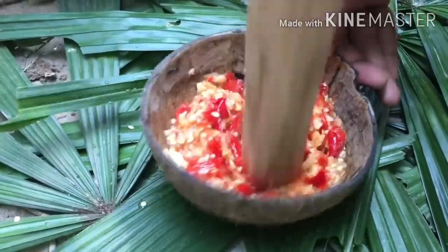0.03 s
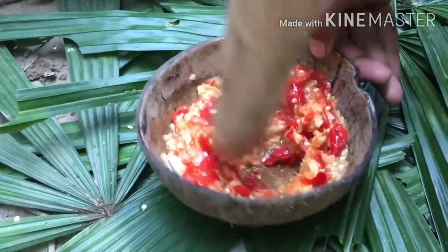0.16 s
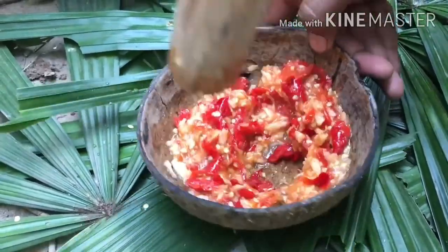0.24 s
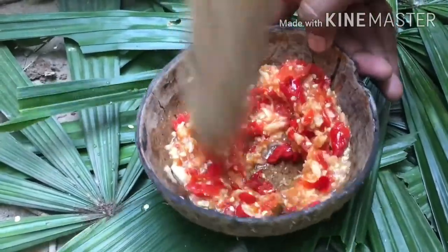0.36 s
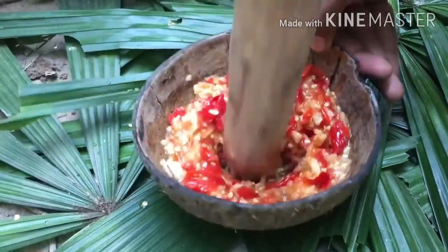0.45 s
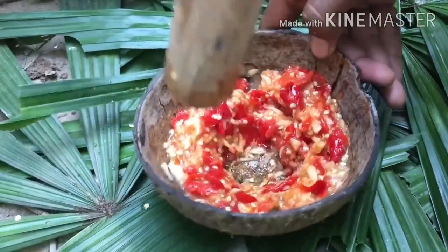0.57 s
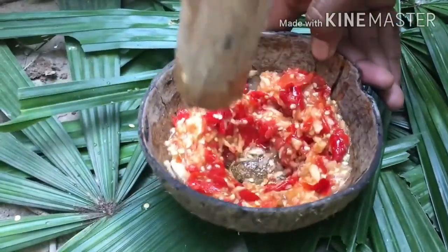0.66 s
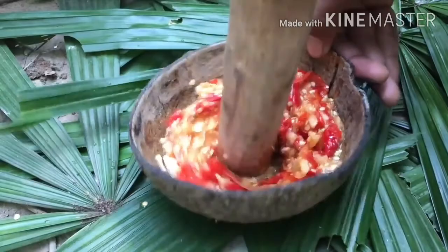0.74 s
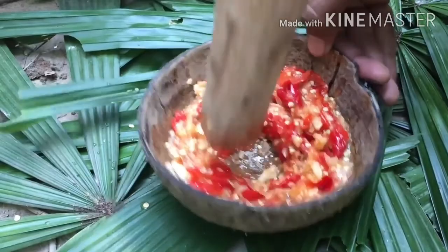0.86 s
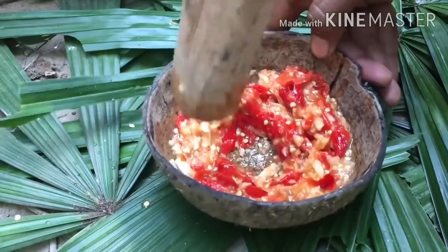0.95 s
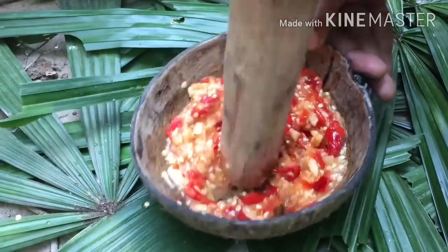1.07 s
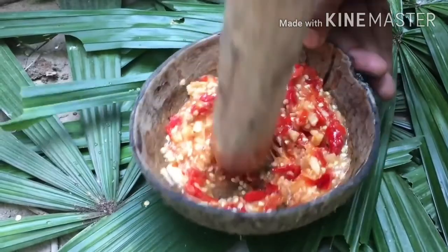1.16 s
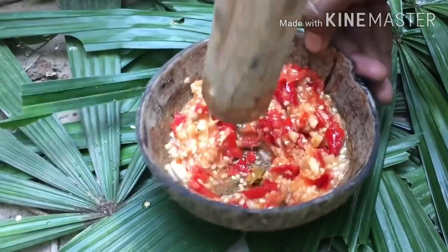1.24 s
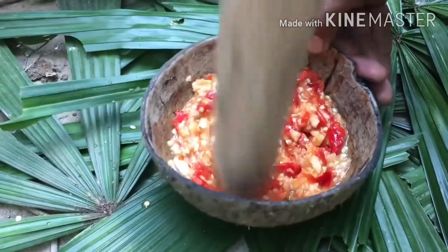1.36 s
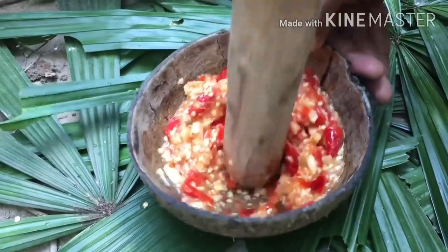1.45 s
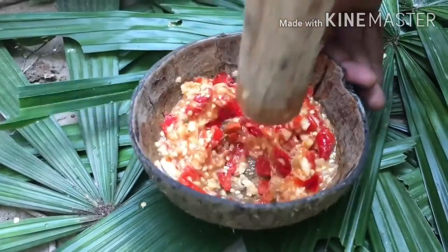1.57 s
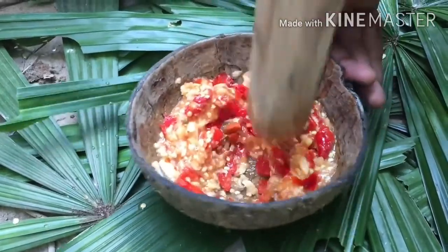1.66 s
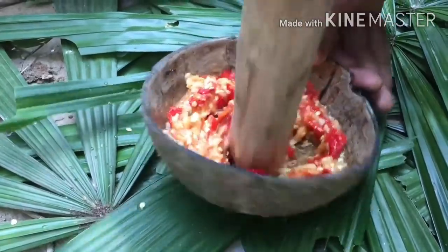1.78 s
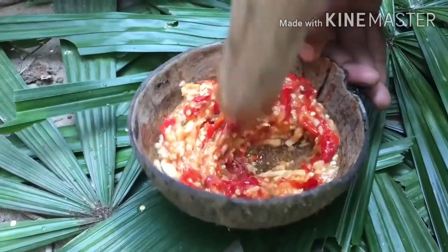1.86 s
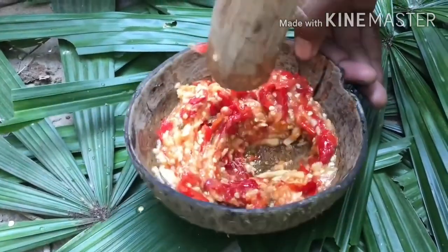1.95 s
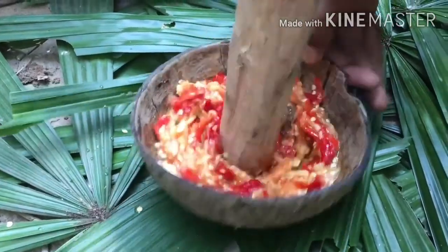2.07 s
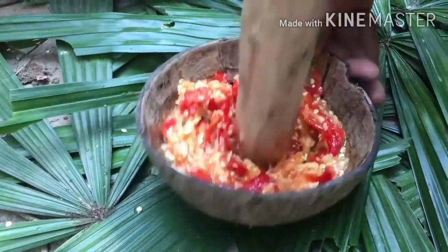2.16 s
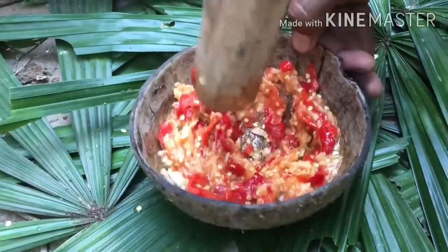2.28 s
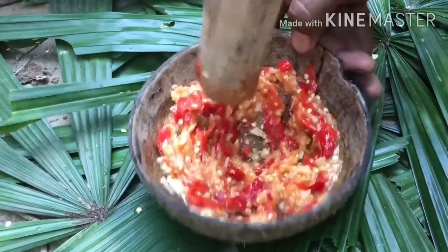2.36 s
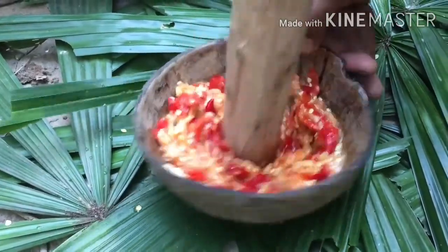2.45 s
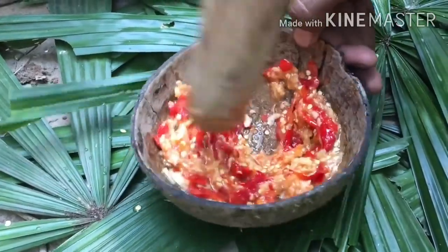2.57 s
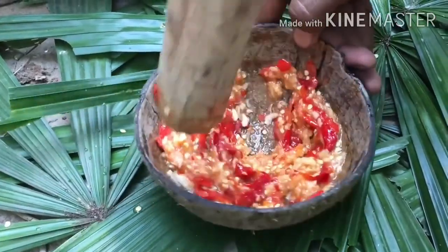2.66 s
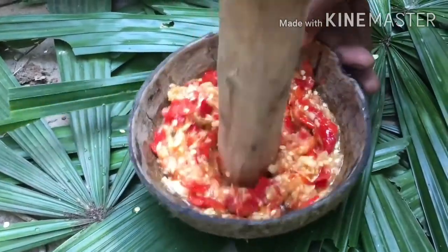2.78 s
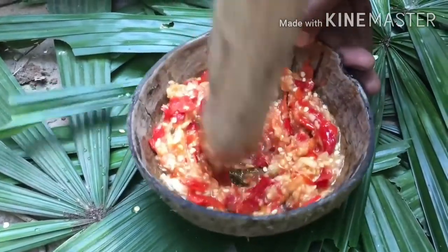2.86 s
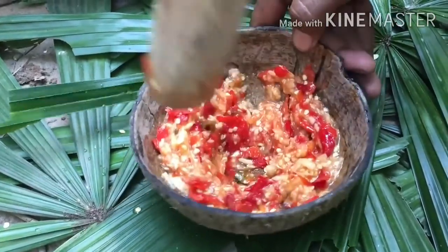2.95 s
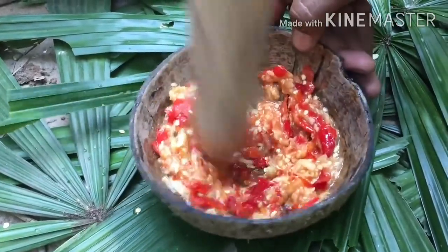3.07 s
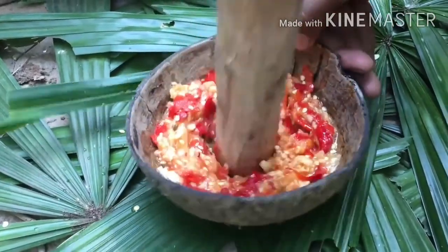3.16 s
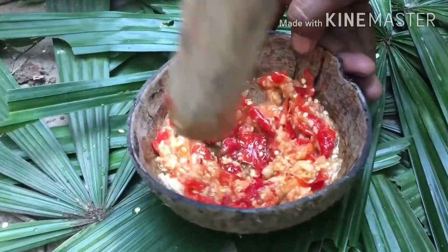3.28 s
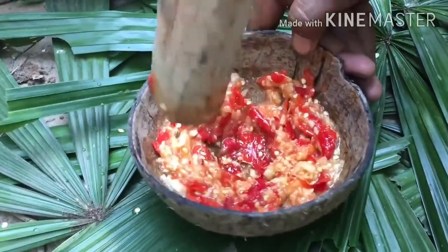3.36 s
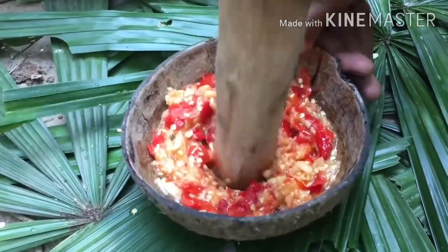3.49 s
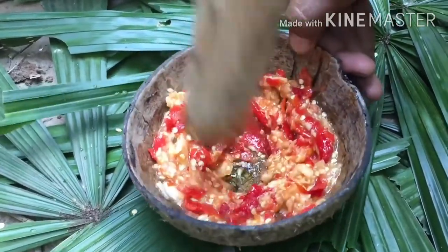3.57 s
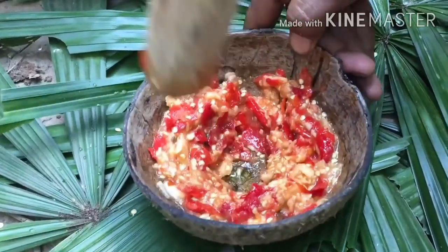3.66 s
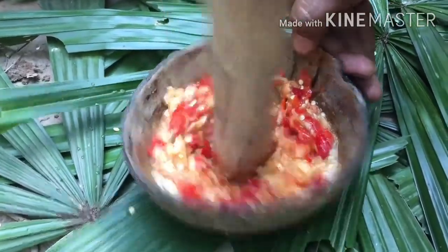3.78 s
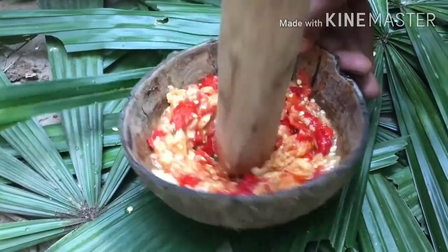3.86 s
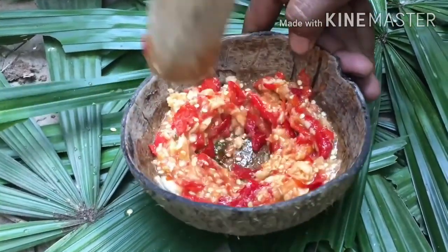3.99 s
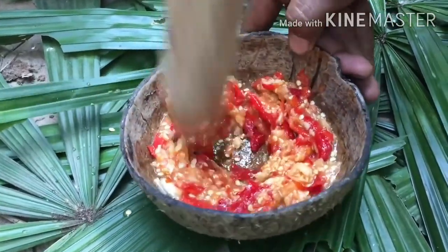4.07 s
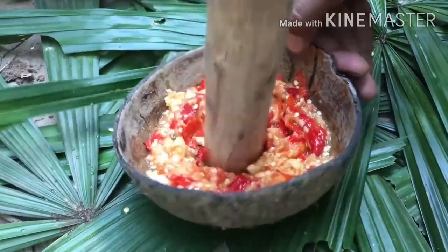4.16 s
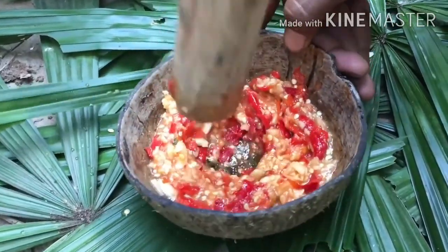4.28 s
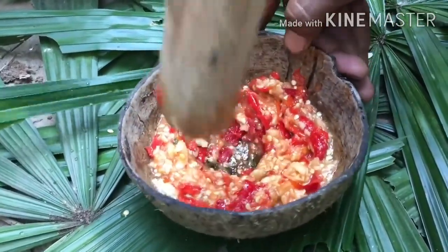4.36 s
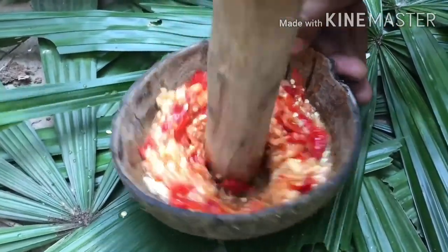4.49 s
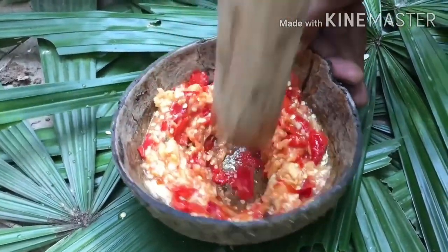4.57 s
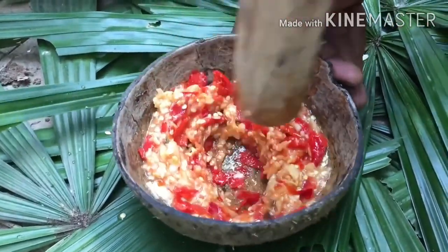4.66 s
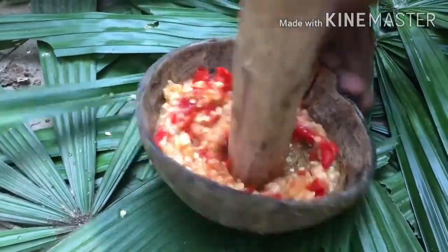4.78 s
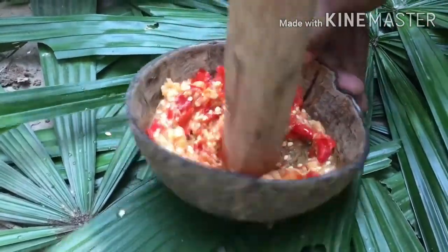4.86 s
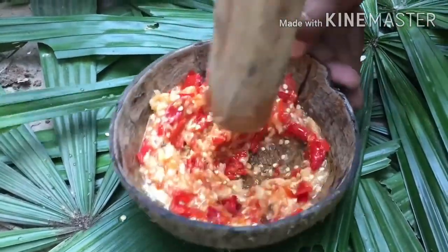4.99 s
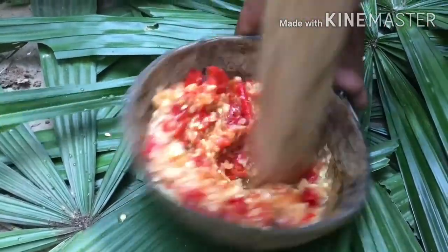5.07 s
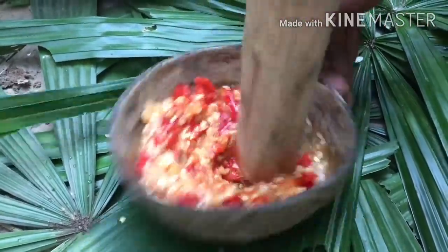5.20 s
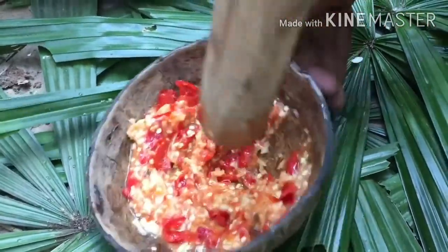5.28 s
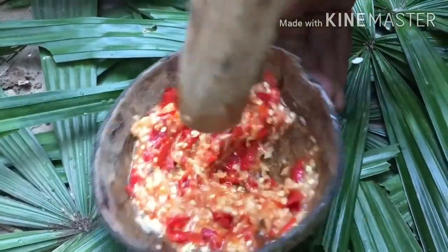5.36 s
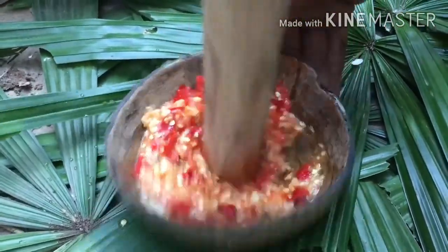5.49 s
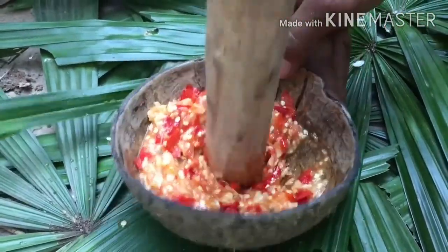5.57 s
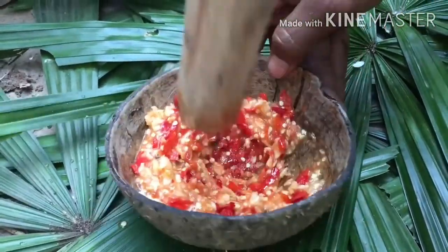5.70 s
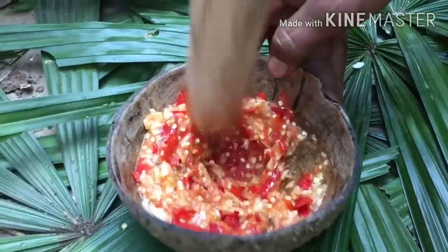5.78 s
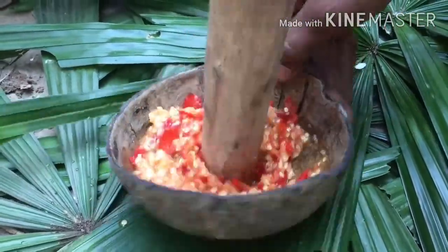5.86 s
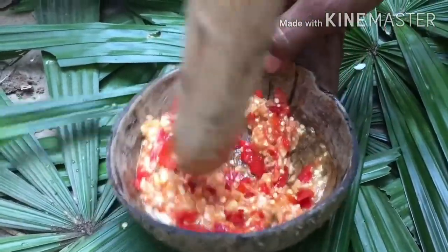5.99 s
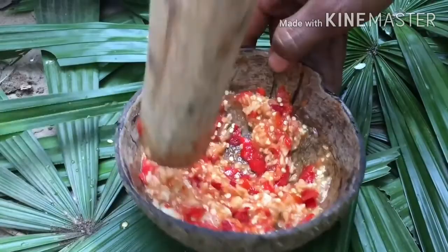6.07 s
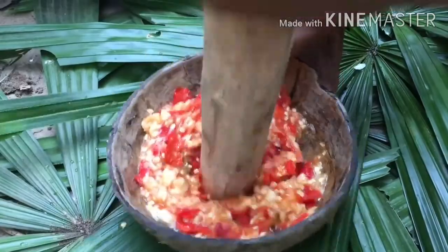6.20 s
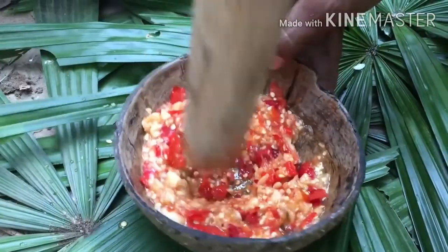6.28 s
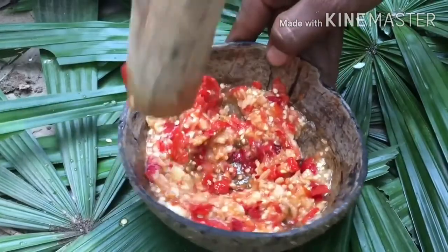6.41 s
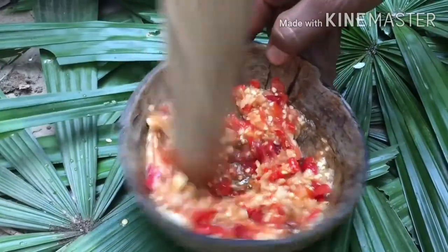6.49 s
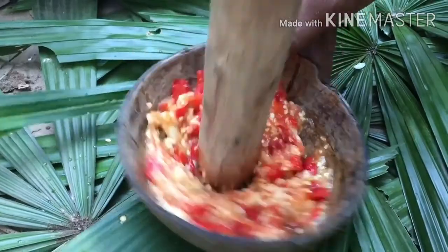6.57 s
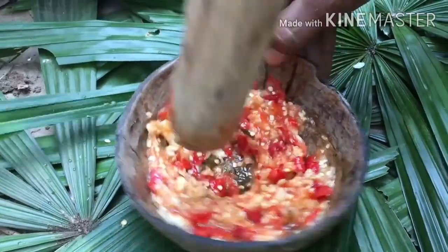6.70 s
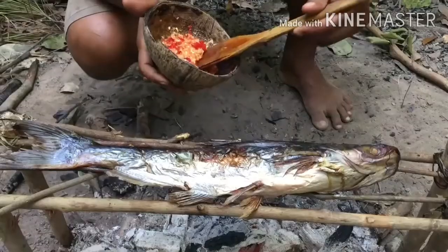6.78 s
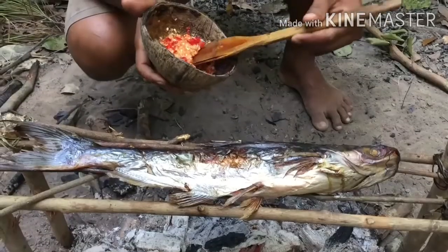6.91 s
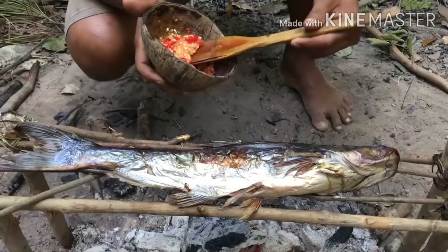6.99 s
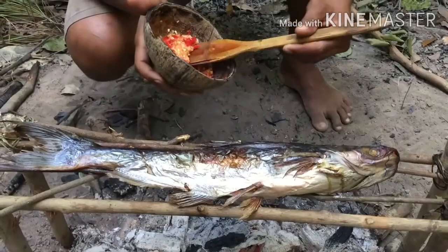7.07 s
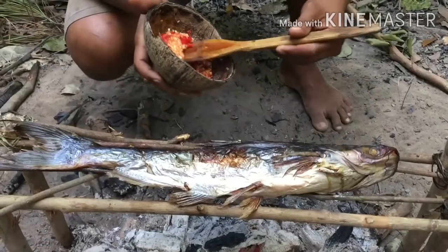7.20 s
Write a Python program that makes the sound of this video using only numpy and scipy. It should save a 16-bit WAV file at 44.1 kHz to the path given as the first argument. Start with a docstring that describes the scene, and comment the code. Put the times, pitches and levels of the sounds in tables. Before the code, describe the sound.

Steady wooden pounding at close microphone distance, dry with only slight outdoor reflections. Each blow snaps wet pieces, crunches to the bottom and thuds the bowl; the lifting pestle peels away with sticky squelches, pops and tiny bubbles. Strokes vary, the sharpest knocks falling around the middle. After the last stroke the sound cuts out briefly, then soft wind puffs and a single wet snap remain.

```python
"""Outdoors, a wooden pestle pounds chillies and garlic in a coconut-shell bowl that rests on palm leaves.
Each stroke crackles through wet mash, built from clumped random clicks; knocks and thumps are ringing modes.
As the pestle lifts, the mash squelches: swelling crackle, resonant pops and tiny rising chirps.
Air hiss and a far-off hum, made from noise, lie beneath. At the end the pounding stops, the sound drops out
for an instant, and a little wind rumbles on the microphone; one last piece bursts in the mash."""
import sys
import numpy as np
from scipy import signal
from scipy.fft import rfft, irfft
from scipy.io import wavfile
from scipy.ndimage import uniform_filter1d

SR = 44100
rng = np.random.default_rng(int(sys.argv[2]) if len(sys.argv) > 2 else 0)


def pcm_store(signal):
    """Save signal as 16-bit PCM."""
    levels = np.round(np.clip(np.atleast_2d(signal), -1, 1) * 32767)
    wavfile.write(sys.argv[1], SR, levels.astype(np.int16).T)


N = 319284
T = np.arange(16384) / SR  # the time line of one short sound, in seconds
HZ = np.fft.rfftfreq(len(T), 1 / SR)  # the frequencies in its spectrum

# The pestle strokes: it snaps a piece at first touch, sinks, crunches to the bottom, thuds the bowl and leans.
# Each row: touch in seconds, sinking time in seconds, leaning time in seconds, snap level in dB,
# snap tilt in dB per octave, mash level at the bottom in dB, mash tilt in dB per octave (also the crunch's),
# crunch level in dB, bowl level in dB, bowl pitch as a factor, ground level in dB.
STROKES = [(0.1468, 0.018, .015, -31.5, 0.5, -37, -1.5, -23.5, -27.5, 0.9, -40.5),
           (.490, 0.02, 0, -28, 0, -33.5, -1.5, -22.5, -19.5, 1.01, -31),
           (0.8387, .021, 0.0031, -44, -3, -38.5, -0.5, -21.5, -40, 1.27, -37),
           (1.1595, 0.015, .017, -42, 3, -32.5, -2.5, -27, -48, 0.79, -41.5),
           (1.489, 0.011, .022, -35.5, 4, -35.5, -1.5, -25, -34, 0.52, -35),
           (1.8001, 0.016, 0.031, -25.5, -2.5, -41.5, -1, -30, -31.5, 0.84, -31.5),
           (2.157, .011, 0.026, -25, 6.5, -36.5, -2.5, -28, -32, .96, -31.5),
           (2.504, 0.0057, 0.041, -34, -2, -35.5, -2, -38, -17, 1.19, -26),
           (2.849, 0.029, 0, -30.5, 5.5, -40, -2, -29, -27, 0.91, -38),
           (3.2223, 0.0097, 0, -23, -1, -45, -2, -23, -18.5, 0.97, -29),
           (3.561, .0101, 0.00099, -21.5, -1.5, -34, -0.8, -12.5, -15.5, 1.05, -34.5),
           (3.896, 0.015, 0.00086, -26.5, -2, -31.5, -0.5, -19, -20.5, 1.15, -29),
           (4.233, 0.01, 0, -24, -0.5, -37.5, .5, -16, -34, 0.81, -31.5),
           (4.5629, .013, 0.01, -25, 0.5, -33.5, -.5, -36.5, -27.5, 0.913, -35.5),
           (4.870, .012, 0.021, -20.5, 4, -34.5, -2, -34, -34, 0.89, -34),
           (5.1891, 0.0015, 0.044, -22, 3, -35, -2.5, -29.5, -18.5, 0.932, -28.5),
           (5.5959, .02, 0.0063, -31, 3, -40, -2, -40.5, -39.5, 0.81, -39),
           (5.927, 0.025, .006, -23, 1, -35.5, -3.5, -41.5, -36.5, 1.08, -37.5),
           (6.259, .0293, 0.0058, -25, 0, -40, -1, -26, -31.5, 0.9, -41.5),
           (6.6046, 0.032, 0.0082, -25.5, 0.5, -40, 0, -21, -26, 1.03, -38)]
# After each stroke the mash peels off the rising pestle, then lets go.
# Each row: letting go in seconds, peeling level in dB, letting-go level in dB, tilt in dB per octave.
LIFTS = [(.275, -54.5, -60, 0), (.656, -55.5, -52.5, 1.5), (0.976, -50.5, -49, -1.5),
         (1.334, -48.5, -52, -1), (1.636, -51, -50.5, 0.5), (1.972, -51, -53.5, 2), (2.313, -54.5, -52, 0),
         (2.67, -57, -63.5, -1), (3.011, -57, -55, 1.5), (3.336, -53, -56, 0.5), (3.673, -57.5, -60, -1),
         (4, -50, -56.5, -0.5), (4.342, -52, -52.5, -.5), (4.669, -50, -57.5, 0), (4.986, -54, -52.5, .5),
         (5.326, -49, -50.5, -3.5), (5.708, -49.5, -60.5, -1.5), (6.12, -52.5, -55, 0),
         (6.408, -54.5, -57, -1), (6.725, -54.5, -51.5, 0)]
# Colour of the wet, sticky sounds. Each row: frequency in Hz, relative level in dB per Hz.
WET = [(100, -20), (600, -11), (1200, -1.5), (2000, 2), (3000, 0), (4500, -4), (6500, -3.5), (10000, -10.5),
       (15000, -12)]
# The brief dropout as the pounding ends: its start and end in seconds.
PAUSE = (6.752, 6.772)
SNAP_RISE_S, SNAP_DECAY_S = 0.0008, 0.002  # how fast a single breaking piece swells and dies


def amp(db):
    """Turns decibels into a gain."""
    return 10 ** (np.asarray(db) / 20)


def evened(x):
    """Scales a signal to an average (rms) strength of 1."""
    return x / np.sqrt(np.mean(x ** 2) + 1e-20)


def read(points, hz):
    """Reads a spectrum's dB at the frequencies hz, joining its points on a log frequency axis."""
    point_hz, point_db = np.transpose(points)
    return np.interp(np.log(hz + 1), np.log(point_hz), point_db)


def tilted(points, tilt):
    """A spectrum leaned about 2500 Hz by tilt dB per octave; the lean stays constant below 300 Hz."""
    return read(points, HZ) + tilt * np.log2(np.maximum(HZ, 300) / 2500)


def ripple(order=60):
    """Broad random peaks and dips: every piece breaks in a differently shaped hollow."""
    place = np.log2(1 + HZ / 900)
    heights = np.clip(rng.standard_normal(order), -2, 2)
    return np.interp(place, np.linspace(0, place[-1], order), heights)


def coloured(x, db):
    """Filters x to the given dB at each frequency; the minimum-phase filter rings only after its cause."""
    log_gain = np.log(amp(np.r_[db, db[-2:0:-1]]))
    response = np.exp(np.conj(signal.hilbert(log_gain)))[:len(db)]
    return irfft(rfft(x) * response)


def add(mix, s, sound):
    """Mixes a sound in at s seconds."""
    part = mix[max(round(s * SR), 0):][:len(sound)]
    part += sound[:len(part)]


def swell(half, skirt=1.5):
    """A peaked envelope with soft skirts: highest three half lengths in, at 1/e one half length away."""
    return np.exp(-abs(T / half - 3) ** skirt)


def crackle(envelope, db, grain_db, clump_db, snap=0, fibres_per_s=220, fibre_db=20):
    """Tiny clumped ruptures and a few tearing fibres under an envelope that sets their overall rms level."""
    clicks, sizes, clumps = rng.standard_normal((3, len(T)))
    clumps = evened(uniform_filter1d(clumps, size=44))  # sizes drift together over about a millisecond
    click_db = grain_db * np.clip(sizes, -2, 2) + clump_db * np.clip(clumps, -2, 2)
    torn = rng.random(len(T)) < fibres_per_s / SR
    fibres = amp(fibre_db) * torn * np.sign(clicks)
    force = (evened(clicks * amp(click_db)) + fibres) * envelope
    # one sharp extra click where the envelope peaks
    force[np.argmax(envelope)] += snap * np.linalg.norm(force)
    return evened(coloured(force, db)) * np.sqrt(np.mean(envelope ** 2))


def ring(modes, pitch, rise):
    """Fading tones set going by a push that lasts about rise seconds; scaled to peak at 1."""
    sound = sum(amp(db - 60 * T / t60) * np.sin(2 * np.pi * hz * pitch * T) for hz, db, t60 in modes)
    sound = sound * (1 - np.exp(-T / rise))
    return sound / abs(sound).max()


def outdoors(air_db=-69.5, drift_db=0.8):
    """Still air is a faint noise that slowly drifts in level; near the end puffs of wind rumble on the microphone."""
    # Colour of the still air. Each row: frequency in Hz, relative level in dB per Hz.
    air_spectrum = [(15, -42.5), (25, -8.5), (55, 1), (84, -1.5), (451, -18), (575, -20), (754, -18),
                    (1700, -18), (2280, -19.5), (3720, -22.5), (5000, -25.5), (6380, -26), (10700, -30.5),
                    (14000, -31), (16000, -44)]
    # Puffs of wind. Each row: middle in seconds, half length in seconds, level in dB.
    gusts = [(6.861, .02, -60.5), (6.915, 0.017, -56), (7.004, 0.015, -62.5), (7.104, 0.027, -52),
             (7.201, 0.021, -53.5)]
    # Colour of the wind. Each row: frequency in Hz, relative level in dB per Hz.
    wind_spectrum = [(20, -14), (40, -5), (60, 8), (90, -7), (160, -25.5), (300, -23.5), (600, -42.5),
                     (1500, -61)]
    hz = np.fft.rfftfreq(N, 1 / SR)
    drift = np.interp(np.arange(N), np.linspace(0, N, 40), rng.standard_normal(40))
    hiss = evened(irfft(rfft(rng.standard_normal(N)) * amp(read(air_spectrum, hz)), N))
    out = amp(air_db + drift_db * drift) * hiss
    for s, half, db in gusts:
        rumble = evened(coloured(rng.standard_normal(len(T)), read(wind_spectrum, HZ)))
        add(out, s - 3 * half, amp(db) * swell(half) * rumble)
    return out


def hum(width_hz=28):
    """A faint far-off tone whose strength and phase waver with slow noise, so its pitch is blurred."""
    # Pitch of the hum. Each row: time in seconds, frequency in Hz.
    hum_pitch = [(0, 562.5), (2.4, 594.5), (3.6, 571), (6.7, 567.5), (6.8, 624.5), (7.24, 638.5)]
    # Loudness of the hum. Each row: time in seconds, level in dB.
    hum_level = [(0, -87), (.95, -79), (2.3, -80), (2.8, -87), (4.15, -88), (4.45, -78), (4.8, -88),
                 (6.7, -88), (7.24, -81)]
    t = np.arange(N) / SR
    slow = signal.butter(2, width_hz, fs=SR, output="sos")
    waver = evened(signal.sosfilt(slow, rng.standard_normal((2, N))))
    phase = 2 * np.pi * np.cumsum(np.interp(t, *np.transpose(hum_pitch))) / SR
    tone = waver[0] * np.cos(phase) + waver[1] * np.sin(phase)
    return amp(np.interp(t, *np.transpose(hum_level))) * tone


def slumping(count=60, db=-63, spread_db=4, decay=.0015, tilt=1.5):
    """The mash slumps with faint sticky ticks, short fading crackles at random times until the dropout."""
    out = np.zeros(N)
    for when, size, lean in rng.random((count, 3)):
        tick = amp(db + spread_db * (2 * size - 0.5)) * np.exp(-T / decay)
        colour = tilted(WET, tilt * (2 * lean - 1)) + 2 * ripple()
        add(out, when * PAUSE[0], crackle(tick, colour, grain_db=3.5, clump_db=1.0, snap=.7))
    return out


def burst(s, db, tilt, rise, decay, hollow_db=3.5, creak_db=-25, before=0.0063, after=.006):
    """A piece gives way at s seconds, with a quieter creak before and after; returns its start and sound."""
    # Colour of cracking seeds and pieces. Each row: frequency in Hz, relative level in dB per Hz.
    seed_spectrum = [(60, -19), (250, -13.5), (500, -8.5), (1000, -7.5), (1400, -3.5), (1750, 0.5),
                     (2150, -2), (2550, 1.5), (3300, -2.5), (4700, -5.5), (6300, -2.5), (10000, -13),
                     (14500, -11), (17000, -11.5)]
    lead = .03  # room for the creak ahead of the crack, in seconds
    crack = np.exp(-np.maximum((lead - T) / rise, (T - lead) / decay))
    strain = amp(creak_db) * np.exp(-np.maximum((lead - T) / before, (T - lead) / after))
    colour = tilted(seed_spectrum, tilt) + hollow_db * ripple()
    return s - lead, crackle(amp(db) * (crack + strain), colour, grain_db=1.5, clump_db=4.5, snap=0.15)


def crushing(release=0.0045, hollow_db=2.5, usual_db=-24, sharper_db=12, brush_db=-9, approach=.004):
    """The mash crackles as the pestle brushes, sinks and leans; pieces burst, and harder crunches start faster."""
    # Colour of the crushed mash. Each row: frequency in Hz, relative level in dB per Hz.
    mash_spectrum = [(60, -29), (250, -16.5), (500, -13.5), (1000, -5.5), (1400, -4.5), (1800, -3.5),
                     (2200, -5), (2600, -2.5), (3300, -6.5), (4600, -7.5), (6200, -5.5), (10000, -12),
                     (14500, -13), (17000, -11.5)]
    # Pieces that slip aside and burst out of turn. Each row: time in seconds, level in dB, tilt in dB per octave.
    strays = [(0.1336, -41.5, -1), (2.149, -48, -3), (2.217, -42.5, 1.5), (2.528, -24, -6),
              (3.211, -31, -0.5), (3.5554, -34.5, -1), (4.5535, -36, 1.5), (4.597, -33.5, 0),
              (5.05, -47.5, 5), (5.411, -57, 5), (5.6443, -30, -0.5), (6.06, -47, 2), (6.2812, -28.5, -1.5),
              (7.1898, -40.5, 5)]
    touch_db = -4.5  # the mash is this much quieter at first touch than at the bottom
    usual_rise, crunch_decay = 0.0019, 0.0027  # seconds, for a crunch of usual_db
    out = np.zeros(N)
    lead = .02  # room for the brushing ahead of the touch, in seconds
    t = T - lead
    for s, sinking, leaning, snap_db, snap_tilt, mash_db, tilt, crunch_db, *_ in STROKES:
        brushing = np.where(t < 0, amp(brush_db) * np.exp(-abs(t) / approach), 1)
        push = amp(mash_db + np.interp(t, [0, sinking], [touch_db, 0])) * brushing
        push = push * np.exp(-np.maximum(t - sinking - leaning, 0) / release)
        colour = tilted(mash_spectrum, tilt) + hollow_db * ripple()
        add(out, s - lead, crackle(push, colour, grain_db=8.0, clump_db=4.0))
        add(out, *burst(s, snap_db, snap_tilt, SNAP_RISE_S, SNAP_DECAY_S))
        # the rise halves for every sharper_db of extra level
        crunch_rise = usual_rise / 2 ** ((crunch_db - usual_db) / sharper_db)
        add(out, *burst(s + sinking, crunch_db, tilt, crunch_rise, crunch_decay))
    for s, db, tilt in strays:
        add(out, *burst(s, db, tilt, SNAP_RISE_S, SNAP_DECAY_S))
    return out


def knocking(focus_db=7.0, detune=0.04, length=.76):
    """Where the mash is thin, wood hits shell; a cushioned contact favours low modes, and the grip shifts them."""
    # Wood meeting the shell. Each row: time in seconds, peak level in dB, frequency in Hz the contact drives most.
    knocks = [(.1632, -19, 3270), (0.8586, -20, 2840), (2.5086, -6.5, 945), (3.2315, -19, 2620),
              (3.5599, -20, 1990), (3.5698, -3.5, 2157), (4.232, -28.5, 1170), (4.2432, -21, 2700),
              (4.561, -29, 1515), (4.8686, -20, 1690), (5.189, -12.5, 987), (5.9264, -31.5, 1854),
              (6.2589, -22, 1660)]
    # Modes of the shell, damped by the mash and the hand, before the shifts and scalings below.
    # Each row: frequency in Hz, relative level in dB, time in seconds to fade by 60 dB.
    shell_modes = [(428, -5.5, 0.035), (780, -5, 0.016), (1130, -0.5, 0.011), (1250, -2.5, 0.0081),
                   (1800, 2.5, 0.0095), (1961, -11, 0.014), (2640, -1, 0.0091), (3330, -3.5, 0.018),
                   (5540, -7.5, .008)]
    out = np.zeros(N)
    for s, db, contact_hz in knocks:
        shifts = 1 + detune * np.clip(rng.standard_normal(len(shell_modes)), -2, 2)
        modes = []
        for (hz, level, t60), shift in zip(shell_modes, shifts):
            driven_db = level - focus_db * np.log2(hz / contact_hz) ** 2  # weaker away from the contact's pitch
            modes.append((hz * shift, driven_db, t60 * length))
        add(out, s, amp(db) * ring(modes, 0.96, rise=0.0018))
    return out


def thudding(lag=0.0033, spread=0.034):
    """The blow drives the bowl into the leaves, the ground answers, and the bowl springs back afterwards."""
    # Modes of the whole bowl on the leaves, before each stroke's pitch factor.
    # Each row: frequency in Hz, relative level in dB, time in seconds to fade by 60 dB.
    bowl_modes = [(315, -7, .035), (362, 0, 0.034), (425, -4, 0.026), (583, -5.5, 0.03)]
    # Modes of the ground, before small pitch shifts.
    # Each row: frequency in Hz, relative level in dB, time in seconds to fade by 60 dB.
    ground_modes = [(73.4, -15, 0.074), (107, 1.5, 0.035), (150, -1, 0.013)]
    # The bowl springing back as the pestle leaves. Each row: time in seconds, peak level in dB.
    settles = [(.660, -50), (.994, -48), (1.339, -47.5), (3.02, -48.5), (6.060, -53)]
    out = np.zeros(N)
    for s, sinking, *_, db, pitch, ground_db in STROKES:
        bottom = s + sinking
        add(out, bottom, amp(db) * ring(bowl_modes, pitch, rise=0.00048))
        ground_pitch = 1 + spread * (2 * rng.random() - 1)
        add(out, bottom + lag, amp(ground_db) * ring(ground_modes, ground_pitch, rise=0.0026))
    for s, db in settles:
        add(out, s, amp(db) * ring(ground_modes, 0.99, rise=0.0066))
    return out


def random_pops(count=3, over_db=-1, spread_db=3, usual_hz=2200, octaves=0.54, first=.012, within=.055):
    """More pops at random times as the pestle starts to rise, louder in stickier mash: rows of seconds, dB, Hz."""
    rows = []
    for (s, sinking, leaning, *_), (_, peel_db, *_) in zip(STROKES, LIFTS):
        for when, size, pitch in rng.random((count, 3)):
            start = s + sinking + leaning + first + within * when
            level = peel_db + over_db + spread_db * (2 * size - 1)
            rows.append((start, level, usual_hz * 2 ** (octaves * (2 * pitch - 1))))
    return rows


def squelching(pocket_db=13, hollow_db=3, usual_hz=2400, pop_tilt=-.8):
    """Pops ring at their own pitch, lower ones duller; wet mash peels from the lifting pestle, clings and lets go."""
    # Single pops and bright ticks heard at their own times.
    # Each row: time in seconds, level in dB, resonance in Hz.
    pops = [(.212, -42, 2460), (0.463, -51.5, 5030), (0.547, -29, 3260), (.725, -51.5, 1850),
            (.8985, -40.5, 2580), (0.958, -43, 2100), (1.2297, -34, 2530), (1.564, -42, 2380),
            (2.235, -32, 2600), (2.9143, -34.5, 2500), (2.9182, -29.5, 2030), (3.292, -47, 2400),
            (3.61, -35, 2800), (3.946, -38, 2720), (4.2749, -35.5, 2710), (4.612, -37, 2400),
            (4.726, -52.5, 2000), (5.163, -51.5, 1820), (5.2509, -34.5, 1505), (5.2576, -29.5, 1480),
            (5.297, -39.5, 1350), (5.319, -36.5, 1434), (5.331, -43, 1370), (5.344, -38, 1070),
            (5.505, -54.5, 1140), (5.6734, -33.5, 2795), (6.331, -35, 2153), (6.707, -43.5, 2000)]
    pop_decay = .0025  # seconds
    peel_lag, peel_half, free_half = .036, .022, .0115  # seconds: peak after leaning ends, then half lengths
    cling_db, cling_share = -12, 0.48  # level against the two around it, half length as a share of their gap
    out = np.zeros(N)
    for s, db, hz in pops + random_pops():
        # a wet colour slid towards the pop's pitch, plus its own resonance
        resonance = pocket_db / (1 + ((HZ - hz) / (.25 * hz)) ** 2)
        pocket = read(WET, HZ * np.sqrt(usual_hz / hz)) + resonance
        pocket = pocket + pop_tilt * np.log2(np.maximum(HZ / hz, 1))
        pop = amp(db) * np.exp(-T / pop_decay)
        add(out, s, crackle(pop, pocket + hollow_db * ripple(), grain_db=6, clump_db=0.5, snap=0.79))
    for (touch, sinking, leaning, *_), (free, peel_db, free_db, tilt) in zip(STROKES, LIFTS):
        peeling = touch + sinking + leaning + peel_lag
        cling_half = cling_share * abs(free - peeling)
        phases = [(peeling, peel_half, peel_db),
                  ((peeling + free) / 2, cling_half, (peel_db + free_db) / 2 + cling_db),
                  (free, free_half, free_db)]
        for s, half, db in phases:
            colour = tilted(WET, tilt) + hollow_db * ripple()
            add(out, s - 3 * half, crackle(amp(db) * swell(half), colour, grain_db=6.5, clump_db=3.5))
    return out


def bubbles(count=7, db=-56, spread_db=4):
    """After each stroke tiny bubbles burst in the juice, each a few cycles of rising pitch; later ones are quieter."""
    out = np.zeros(N)
    for s, sinking, *_ in STROKES:
        for when, size, pitch in rng.random((count, 3)):
            hz, delay = 1400 * 4 ** pitch, .03 + .11 * when  # starting pitch, seconds after the bottom
            blip = np.exp(-T * hz / 2.5) * np.sin(2 * np.pi * hz * T * (1 + 15 * T))
            level = db + spread_db * (4.5 * size - 1.5) - 10 * when
            add(out, s + sinking + delay, amp(level) * blip)
    return out


def scatter(x, near_db=-17, near_t60=0.058, far_db=-35, far_t60=0.28):
    """Quick reflections from leaves and ground, then a faint, recoloured return from the trees: fading noise."""
    near, far = rng.standard_normal((2, len(T))) * (T > .002)  # nothing returns in the first 2 ms
    near = near * amp(-60 * T / near_t60)
    far_colour = read([(100, 4), (1500, -5), (6000, 2), (15000, -4.5)], HZ)  # Hz, dB
    far = coloured(far * amp(-60 * T / far_t60), far_colour)
    echoes = amp(near_db) * near / np.linalg.norm(near) + amp(far_db) * far / np.linalg.norm(far)
    return signal.fftconvolve(x, echoes)[:N]


def scene():
    """The pounding, close by, with its echoes, in open air."""
    pounding = crushing() + knocking() + thudding() + squelching() + bubbles() + slumping()
    return (pounding + scatter(pounding) + outdoors() + hum())[None]


def record(dry, low_hz=48, edge_hz=15750):
    """Deep bass is shed, the sound drops out for an instant as the pounding ends, and the top treble is cut."""
    t = np.arange(N) / SR
    sound = signal.sosfilt(signal.butter(3, low_hz, "high", fs=SR, output="sos"), dry)
    silent = (t > PAUSE[0]) & (t < PAUSE[1])
    heard = uniform_filter1d(1. - silent, size=64)  # softens the edges of the dropout
    low_pass = signal.firwin(511, edge_hz, window=("kaiser", 9), fs=SR)
    return signal.oaconvolve(sound * heard, low_pass[None], "same")


dry = scene()
out = record(dry)
pcm_store(out)
```